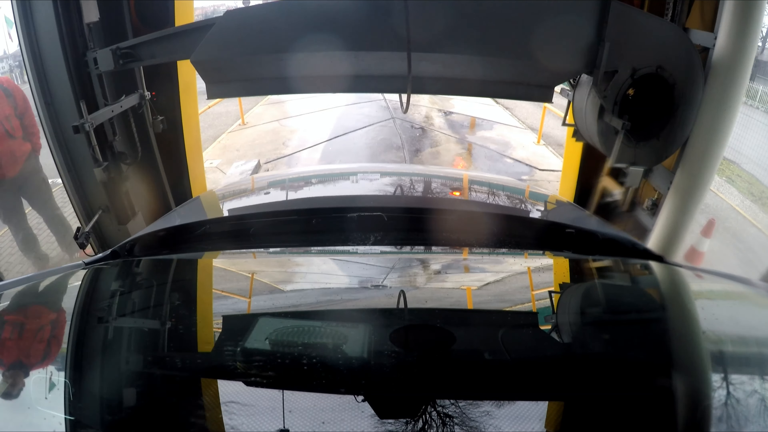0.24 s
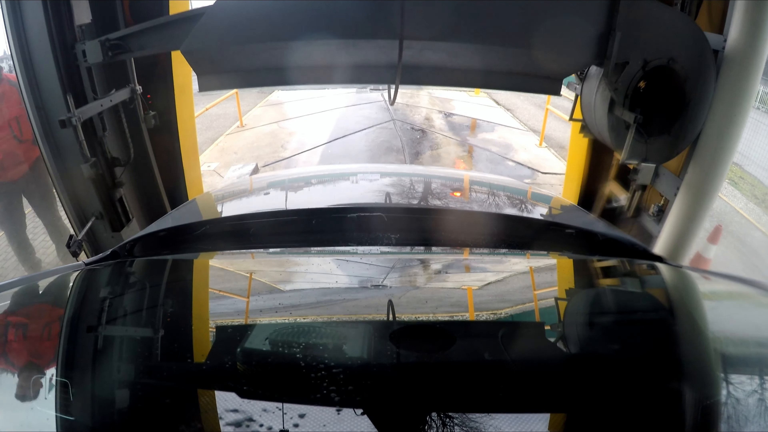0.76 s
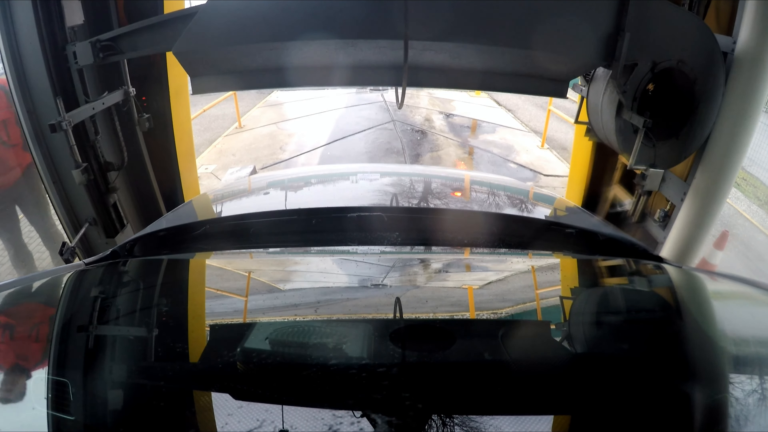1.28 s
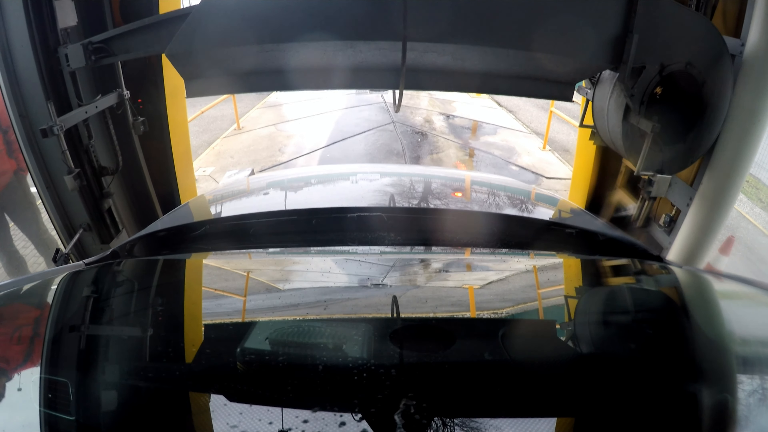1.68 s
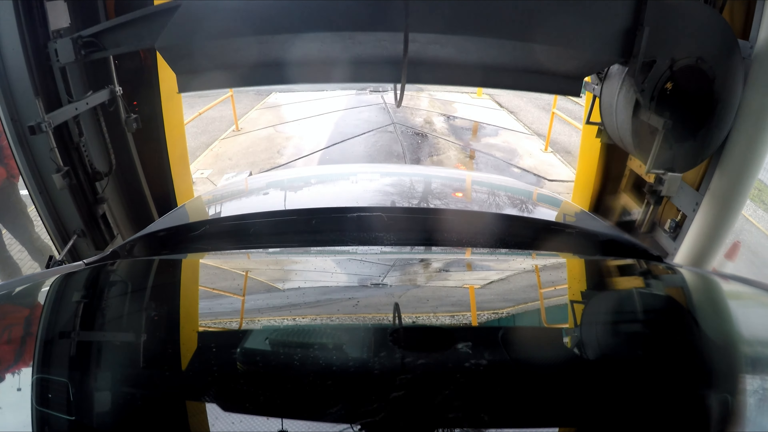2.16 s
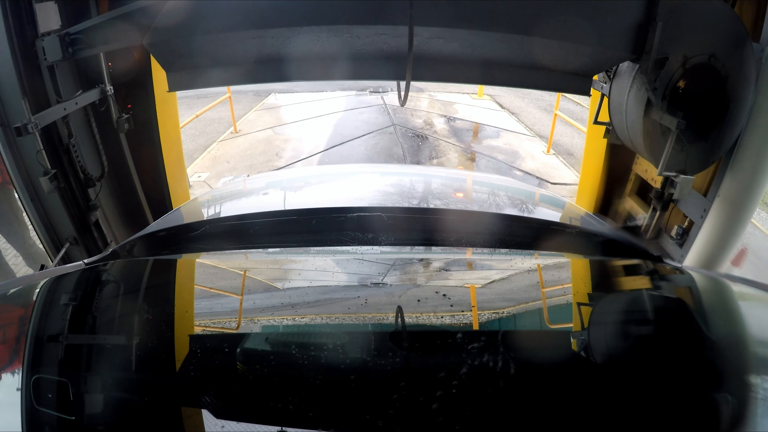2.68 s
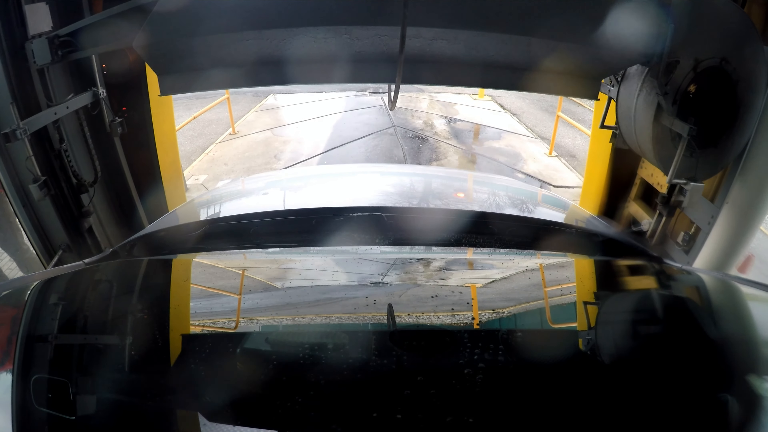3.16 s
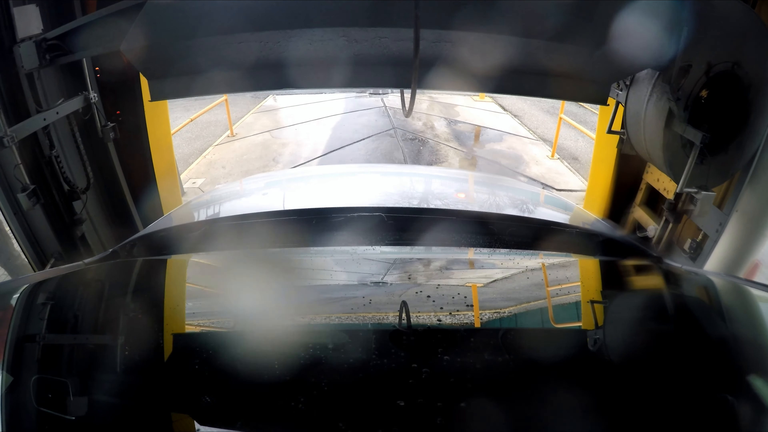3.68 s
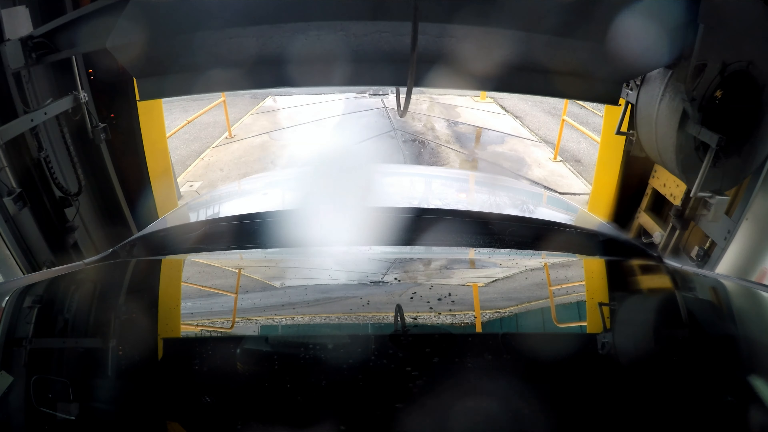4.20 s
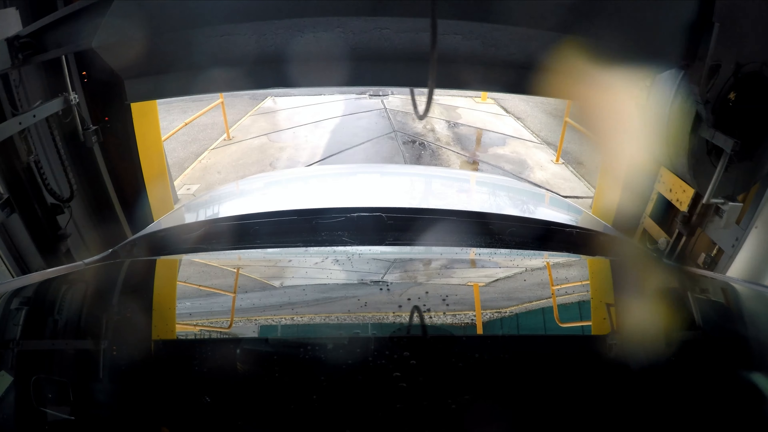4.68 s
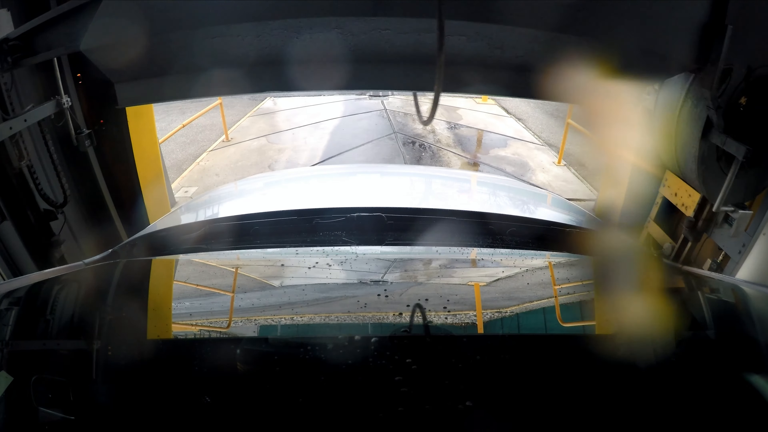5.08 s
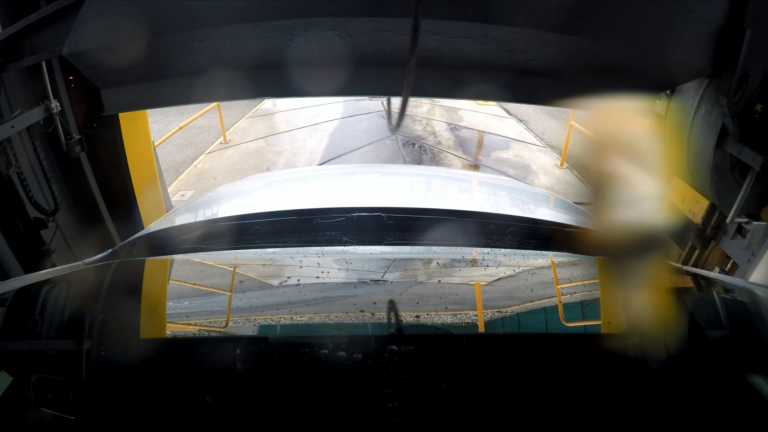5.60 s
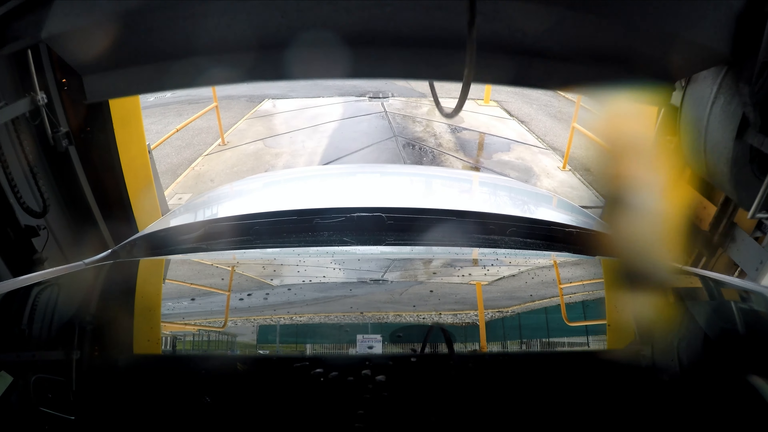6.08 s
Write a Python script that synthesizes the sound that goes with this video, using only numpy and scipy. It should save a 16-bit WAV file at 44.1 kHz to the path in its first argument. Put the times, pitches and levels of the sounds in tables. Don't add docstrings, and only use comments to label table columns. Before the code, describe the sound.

Car-wash dryer fans roar steadily behind an air jet that booms, thumps and flaps a small camera housing, with whistling, rasping puffs across its microphone.

```python
import sys
import numpy as np
from scipy import signal
from scipy.fft import rfft, irfft, next_fast_len
from scipy.io import wavfile
from scipy.ndimage import uniform_filter1d, map_coordinates

SR = 44100
rng = np.random.default_rng(int(sys.argv[2]) if len(sys.argv) > 2 else 0)


def master_out(mix):
    frames = np.transpose(np.atleast_2d(mix))
    ceiling = np.clip(frames, -1, 1)
    pcm = np.round(ceiling * 32767).astype(np.int16)
    wavfile.write(sys.argv[1], SR, pcm)


def natural_amplitude(level_db):
    exponent = np.asarray(level_db, float) / 20
    return 10 ** exponent


N = 279594

# start_s, level_db
FAN_LEVEL = [
    (0, -44),
    (.2, -44.5),
    (1.2, -46),
    (2.8, -47),
    (3.3, -42.5),
    (4.7, -44),
    (5.0, -41),
    (5.35, -38),
    (6.34, -36.5),
]
# freq_hz, level_db
ROAR_SPECTRUM = [(150, 8.5), (300, 4.5), (800, -3.5), (1450, -3), (1700, -0.5), (2700, -1.5), (3300, -8.5),
                 (3500, -10), (3950, -12), (5700, -10.5), (7000, -20), (10000, -29), (16000, -41)]
# centre_hz, width_hz, lift_db
DUCT_MODES = [(1172, 140, 7), (1710, 160, 1.5), (3260, 90, -5.5), (3680, 200, 9.5), (3880, 60, 2)]
# multiple, level_db
BLADE_TONES = [(1, -5), (2, 0), (3, -3), (4, -14), (6, -38), (7, -30), (8, -10.5)]
# start_s, peak_db, pitch_hz
DROP_TICKS = [(4.6409, -48, 11600), (4.8818, -40, 11600), (4.994, -42, 11600), (5.2041, -49, 12300),
              (5.3088, -41, 11900), (5.5494, -41, 12100), (5.7369, -35, 12600), (5.7774, -41, 11700),
              (5.7854, -40, 12400), (5.7927, -33, 11500), (5.875, -42, 12800), (5.8814, -45, 12300),
              (5.9643, -42, 12300), (6.0127, -43, 12500), (6.1549, -32, 12900), (6.2816, -41, 11900)]
# start_s, port_db, housing_db
JET_AIM = [(0, -2, -0.5), (1.0, 1, -1.5), (1.2, -3, -2), (2.2, 0, -4.5), (2.8, -2, 1), (3.1, -1.5, 2.5),
           (3.85, -1, 1), (3.97, -15, -14), (4.4, -1.5, -3), (4.8, -7.5, -13), (5.3, -9, -2),
           (5.7, -6, -10), (6.34, -11, -2.5)]
# centre_s, length_s, peak_db
BOOM_SWELLS = [(.09, 0.14, -15), (0.373, 0.24, -16.5), (0.628, 0.14, -22), (0.93, 0.13, -14),
               (1.124, 0.058, -11), (1.23, 0.044, -10.5), (1.54, 0.083, -8), (1.673, 0.05, -14),
               (1.786, 0.076, -15.5), (2.03, 0.05, -14), (2.245, 0.14, -20.5), (2.44, 0.077, -14),
               (2.658, 0.025, -14), (2.804, 0.074, -14), (3.114, 0.11, -16.5), (3.303, 0.15, -24),
               (3.476, .07, -12.5), (3.615, 0.087, -14), (3.806, 0.14, -15), (4.024, 0.2, -20.5),
               (4.255, 0.068, -13.5), (4.376, 0.059, -11), (4.5, 0.12, -20.5), (4.71, 0.13, -17.5),
               (4.97, .14, -17), (5.215, 0.24, -23), (5.427, 0.092, -15), (5.7, 0.44, -20),
               (5.967, 0.072, -13), (6.144, 0.14, -16.5)]
# centre_s, length_s, level_db, flap_share_db
HOUSING_GUSTS = [(0.022, 0.085, -12, -0.5), (0.34, 0.36, -20, 3), (0.455, 0.033, -19, -1),
                 (0.653, 0.11, -16.5, -6), (0.83, 0.027, -16, 4.5), (0.917, 0.16, -20.5, 5),
                 (1.07, 0.13, -17, -1), (1.248, 0.054, -21.5, -1), (1.49, 0.14, -16, 5.5),
                 (1.787, 0.1, -11, 1), (2.003, 0.097, -23.5, 6.5), (2.14, 0.048, -10.5, -3),
                 (2.268, .07, -15, -3), (2.42, 0.1, -14.5, 0.5), (2.57, 0.055, -20, 5.5),
                 (2.746, 0.13, -21.5, 3), (2.862, 0.046, -26, -5), (3.034, 0.18, -24.5, 2),
                 (3.33, .08, -20, -0.5), (3.437, .1, -18, -1.5), (3.62, 0.084, -17.5, 4),
                 (3.84, 0.14, -18, -0.5), (4.044, 0.062, -16.5, 5.5), (4.304, 0.13, -18.5, 3),
                 (4.665, 0.22, -26.5, 2), (5, 0.18, -21.5, -3.5), (5.244, 0.15, -25, -5),
                 (5.62, 0.041, -15, -5.5), (5.817, 0.1, -14, -4.5), (6.13, 0.055, -19.5, -5)]
# freq_hz, level_db
BOOM_SPECTRUM = [(10, -17.5), (22, -10.5), (36, -3.5), (47, 1), (54, -6), (64, -16), (85, -16), (110, -20),
                 (180, -120)]
# freq_hz, level_db
THUMP_SPECTRUM = [(35, -17), (62, -3.5), (100, -5), (150, -11.5), (210, -27), (400, -76)]
# freq_hz, level_db
FLAP_SPECTRUM = [(80, -46), (150, 0), (250, -3.5), (400, -11.5), (600, -25.5), (1000, -38.5), (2000, -76)]
# centre_s, length_s, level_db, brightness_db
PORT_GUSTS = [(0.024, 0.089, -23.5, 10), (.15, 0.035, -21, 9), (0.292, 0.12, -26, 7),
              (0.456, 0.065, -22, 7), (0.58, 0.057, -28.5, 10.5), (0.661, 0.031, -24.5, 0),
              (0.81, .08, -27.5, 10.5), (0.908, 0.093, -26, 7), (1.048, 0.079, -28, 8),
              (1.226, 0.05, -22.5, 2), (1.478, 0.11, -42, 19), (1.555, 0.031, -26, 8),
              (1.66, 0.097, -33, 8), (1.795, 0.11, -26, 7), (2.008, .05, -33, 2), (2.13, 0.043, -26.5, 9),
              (2.267, 0.053, -23.5, 2), (2.423, .12, -27, -3), (2.596, 0.038, -29, -3),
              (2.772, 0.2, -26.5, 1), (3.21, 0.048, -31, -11), (3.442, 0.042, -20.5, -2),
              (3.59, 0.082, -28.5, 5.5), (3.878, 0.061, -24, -1), (4.03, 0.027, -21.5, -7),
              (4.283, 0.096, -32, -13), (4.35, 0.035, -32, 11), (4.456, 0.035, -28, -3),
              (4.665, 0.067, -35, 9), (4.927, 0.029, -27, 1)]
# start_s, peak_db, brightness_db
PORT_PUFFS = [(0.0189, -18, 5), (0.1106, -27, 0), (0.385, -8.5, 11), (0.4479, -20, 3), (0.486, -31, 2),
              (0.5626, -17, -3), (0.5901, -14, -6), (0.813, -10.5, 2), (1.027, -3, 7), (1.4934, -10, 8),
              (1.5333, -11, 0), (1.8043, -18, 2), (2.106, -19, -6), (2.3501, -15, -10), (2.55, -13, 14),
              (2.5785, -13, -3), (2.612, -7.5, -5), (2.6584, -18, 0), (2.7556, -12, 0), (2.817, -19, 2),
              (2.9617, -14, -5), (3.053, -16, -5), (3.254, -13, -8), (3.4201, -18, -13), (3.5823, -18, 0),
              (3.69, -10, 3), (3.7414, -15, 2), (3.776, -18, -6), (3.8566, -24, 0), (4.279, -14.5, -6)]
# start_s, peak_db, length_s
PORT_SPURTS = [(0.033, -40, 0.014), (0.161, -33, 0.013), (0.233, -35, 0.015), (0.35, -32.5, 0.024),
               (0.454, -37, 0.024), (0.4758, -40, 0.022), (0.647, -34, 0.024), (0.752, -36, 0.019),
               (0.825, -34, 0.019), (0.882, -33, 0.031), (0.95, -36, 0.02), (1.05, -41, 0.015),
               (1.204, -34, 0.025), (1.244, -33, 0.019), (1.5229, -39, 0.022), (1.629, -33, 0.014),
               (1.762, -41, 0.018), (2.008, -35, 0.022), (2.137, -36, 0.015), (2.244, -43, 0.026),
               (2.368, -42, 0.02), (2.434, -33, 0.022), (3.597, -39, 0.02), (4.0198, -40, 0.02),
               (4.361, -33, 0.017), (4.896, -48, 0.02), (5.3094, -37, 0.022), (5.5394, -34, 0.022),
               (5.781, -26, 0.019), (6.1994, -35, 0.02)]
# freq_hz, level_db
WHISTLE_SPECTRUM = [(500, -19.5), (1000, -18), (1500, -14.5), (2000, -3), (2300, -0.5), (2430, -10.5),
                    (2800, -13), (3600, -52.5)]
# centre_hz, width_hz, lift_db
CAVITY_MODE = [(2380, 110, -1)]
# freq_hz, level_db
RASP_SPECTRUM = [(1800, -2), (2600, 0), (3100, -2), (3370, -8), (3700, -6.5), (4300, -8), (4600, -13),
                 (6000, -39)]
# freq_hz, level_db
HISS_SPECTRUM = [(3500, -3.5), (4700, -1), (5250, 6.5), (6200, -10), (6700, 0), (8000, -13), (9600, -8.5),
                 (10500, -15), (12300, -15), (14000, -38), (16000, -21)]

BLADE_HZ, EDGE_HZ, TOP_HZ = 577.4, 2260, 15400
CALM_BOOM_DB, CALM_THUMP_DB, CALM_FLAP_DB = -21.5, -27, -29
CALM_WHISTLE_DB, CALM_RASP_DB, CALM_HISS_DB = -31, -38.5, -49
GUST_STEEP, SLAP_STEEP, BOOM_STEEP = 2.7, 1.92, 2.35
TIME_S = np.arange(N) / SR


def unit(x):
    return x / np.sqrt(np.mean(x ** 2) + 1e-20)


def noise():
    return rng.standard_normal(N)


def curves(rows):
    s, *columns = np.transpose(rows)
    return [np.interp(TIME_S, s, column) for column in columns]


def wobble(rate_hz):
    return map_coordinates(rng.standard_normal(N // 40), [TIME_S * rate_hz])


def coloured(x, spectrum, modes=()):
    size = next_fast_len(N + 8192)
    hz = np.fft.rfftfreq(size, 1 / SR) + 1
    freq_hz, db = np.transpose(spectrum)
    level_db = np.interp(np.log(hz), np.log(freq_hz), db, left=-120)
    for centre_hz, width_hz, lift_db in modes:
        level_db = level_db + lift_db * np.exp(-((hz - centre_hz) / width_hz) ** 2)
    return unit(irfft(rfft(x, size) * natural_amplitude(level_db), size)[:N])


def patchy(patchy_db):
    z = signal.stft(rng.standard_normal(N + 512), nperseg=512)[2]
    field = uniform_filter1d(rng.standard_normal(z.shape), size=8, axis=0)
    field = uniform_filter1d(field, size=6, axis=1)
    return signal.istft(z * natural_amplitude(patchy_db * unit(field)), nperseg=512)[1][:N]


def steady(x, window_s):
    power = np.abs(uniform_filter1d(x ** 2, int(window_s * SR)))
    return x / np.sqrt(power + 0.027)


def swells(centre_s, length_s, db, steep):
    t = np.arange(0, N + 64, 64) / SR
    distance = np.abs(2 * (t - centre_s[:, None]) / length_s[:, None])
    bells = natural_amplitude(db)[:, None] * 0.5 ** (distance ** steep)
    return np.interp(TIME_S, t, bells.sum(axis=0))


def fans():
    roar_db, = curves(FAN_LEVEL)
    mean_db = roar_db.mean()
    tone_db = mean_db - 2 + 1.25 * (roar_db - mean_db) + 1.5 * wobble(2.95)
    roar = coloured(patchy(-0.2) * natural_amplitude(0.7 * wobble(70)), ROAR_SPECTRUM, DUCT_MODES)
    phase = 2 * np.pi * np.cumsum(BLADE_HZ * (1.002 + 0.0085 * wobble(55))) / SR
    tones = np.zeros(N)
    for multiple, db in BLADE_TONES:
        tones += natural_amplitude(db + 3.5 * wobble(35)) * np.sin(multiple * phase + 6 * rng.random())
    return natural_amplitude(roar_db + 12 + 0.5 * wobble(6.7)) * roar + natural_amplitude(tone_db) * tones


def drops():
    out, t = np.zeros(N + SR), np.arange(SR // 100) / SR
    for start_s, peak_db, pitch_hz in DROP_TICKS:
        spit = 0.4 * np.diff(rng.standard_normal(len(t) + 2), 2)
        tick = np.sin(2 * np.pi * pitch_hz * t)
        decay = natural_amplitude(peak_db + 3.5 - 60 * t / 0.0032)
        out[round(start_s * SR):][:len(t)] += decay * (tick + spit)
    return out[:N]


def housing(eddies):
    aim_db = curves(JET_AIM)[1]
    centre_s, length_s, db, flap_share_db = np.transpose(HOUSING_GUSTS)
    lumps = natural_amplitude(1.87 * eddies + 4.6 * wobble(60))
    boom = steady(coloured(noise(), BOOM_SPECTRUM), window_s=0.064)
    thump = steady(coloured(lumps * noise(), THUMP_SPECTRUM), window_s=0.0607)
    flap = steady(coloured(lumps * noise(), FLAP_SPECTRUM), window_s=0.033)

    boom_gain = natural_amplitude(CALM_BOOM_DB + 3.8 * wobble(8.8))
    boom_gain += swells(*np.transpose(BOOM_SWELLS), BOOM_STEEP)
    boom_gain += natural_amplitude(-9 - 150 * (N / SR - TIME_S))
    thump_gain = natural_amplitude(CALM_THUMP_DB + 0.5 * aim_db + 3.2 * wobble(18))
    thump_gain += swells(centre_s, length_s, db - 4, SLAP_STEEP)
    flap_gain = natural_amplitude(CALM_FLAP_DB + aim_db + 1.05 * wobble(14))
    flap_gain += swells(centre_s, length_s, db + flap_share_db - 11, SLAP_STEEP)
    return boom_gain * boom + thump_gain * thump + flap_gain * flap


def puffs():
    gain, t = np.zeros((3, N + SR)), np.arange(SR // 5) / SR
    puff = (1 - np.exp(-t / 0.0015)) * np.exp(-t / 0.0046)
    for start_s, db, bright_db in PORT_PUFFS:
        level = natural_amplitude([[db - 7], [db - 16], [db + bright_db - 29.5]])
        gain[:, round(start_s * SR):][:, :len(t)] += level * puff
    for start_s, db, length_s in PORT_SPURTS:
        spurt = (1 - np.exp(-t / 0.005)) * np.exp(-(t / length_s) ** 2)
        gain[1:, round(start_s * SR):][:, :len(t)] += natural_amplitude([[db + 0.5], [db - 7.5]]) * spurt
    return gain[:, :N]


def edge_tone():
    share = 0.38 + 0.6 * np.exp(-TIME_S / 1.4)
    pitch_hz = EDGE_HZ * (1 + 0.035 * wobble(14) + 0.01177 * wobble(90))
    return share * np.sin(2 * np.pi * np.cumsum(pitch_hz) / SR) * natural_amplitude(3.5 * wobble(30))


def port(eddies):
    aim_db = curves(JET_AIM)[0] + 1.8 * wobble(24.83)
    centre_s, length_s, db, bright_db = np.transpose(PORT_GUSTS)
    flutter_db = 2.65 * wobble(200)
    whistle_puffs, rasp_puffs, hiss_puffs = puffs()

    whistle = coloured(natural_amplitude(0.62 * eddies + flutter_db) * patchy(1.0), WHISTLE_SPECTRUM, CAVITY_MODE)
    whistle = steady(whistle + edge_tone(), window_s=0.094)
    rasp = coloured(natural_amplitude(1.94 * eddies + flutter_db) * patchy(-0.5), RASP_SPECTRUM)
    rasp = steady(rasp, window_s=0.064)
    hiss = coloured(natural_amplitude(2.0 * eddies + 1.1 * flutter_db) * patchy(2.0), HISS_SPECTRUM)
    hiss = steady(hiss, window_s=0.02)

    whistle_gain = natural_amplitude(CALM_WHISTLE_DB + aim_db) + whistle_puffs
    whistle_gain += swells(centre_s, length_s, db - 6, GUST_STEEP)
    rasp_gain = natural_amplitude(CALM_RASP_DB + 0.54 * aim_db) + rasp_puffs
    rasp_gain += swells(centre_s, length_s, db - 16 + 0.6 * bright_db, GUST_STEEP)
    rasp_gain *= natural_amplitude(3.5 * 0.5 ** ((TIME_S / 0.83) ** 4))
    hiss_gain = natural_amplitude(CALM_HISS_DB + 0.37 * aim_db) + hiss_puffs
    hiss_gain += swells(centre_s, length_s, db - 28 + 1.05 * bright_db, GUST_STEEP)
    hiss_gain *= natural_amplitude(1.5 * wobble(18) + 1.75 * wobble(55))
    return whistle_gain * whistle + rasp_gain * rasp + hiss_gain * hiss


def scene():
    eddies = unit(0.42 * wobble(45) + wobble(100))
    return (fans() + drops() + housing(eddies) + port(eddies))[None]


def roll_off(x):
    return signal.sosfilt(signal.butter(12, 15290, fs=SR, output="sos"), x)


def record(dry):
    limited = dry / (1 + np.abs(dry / 1.1) ** 5) ** (1 / 5)
    size = N + 4096
    passband = np.fft.rfftfreq(size, 1 / SR) < TOP_HZ
    mix = irfft(rfft(limited, size) * passband, size)[..., :N]
    return roll_off(mix)


dry = scene()
out = record(dry)
master_out(out)
```